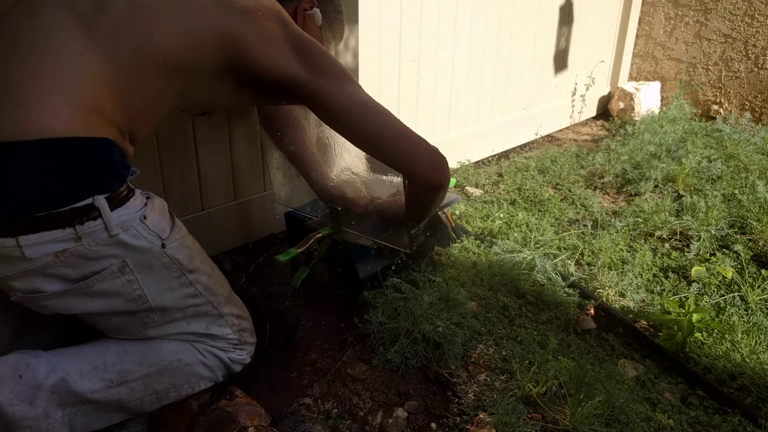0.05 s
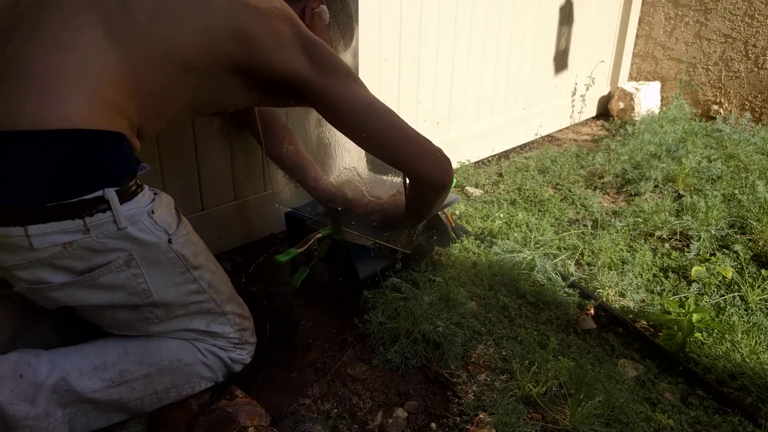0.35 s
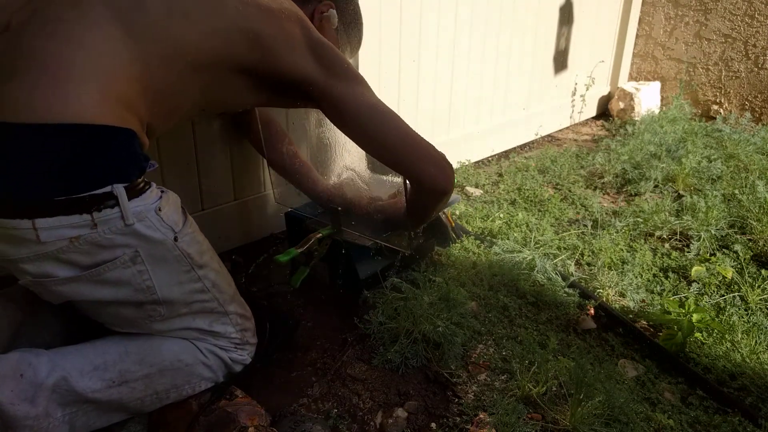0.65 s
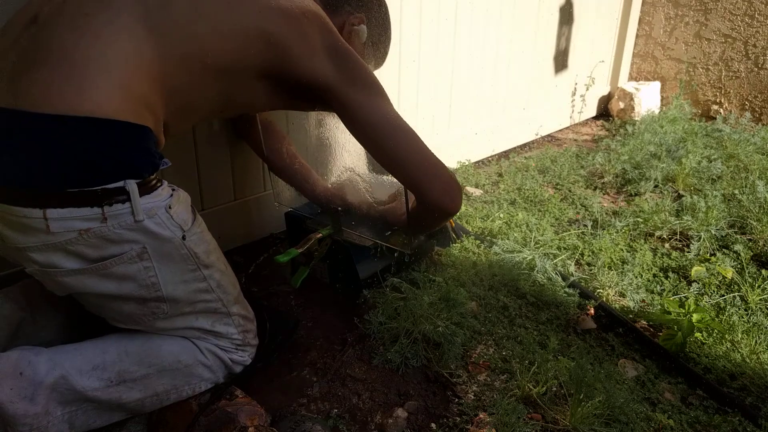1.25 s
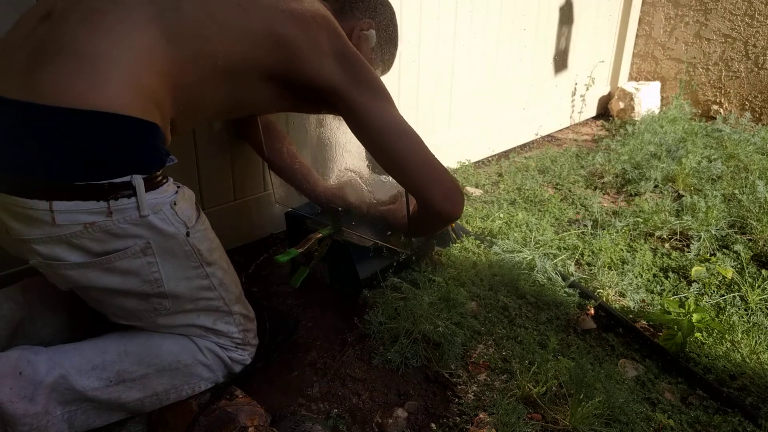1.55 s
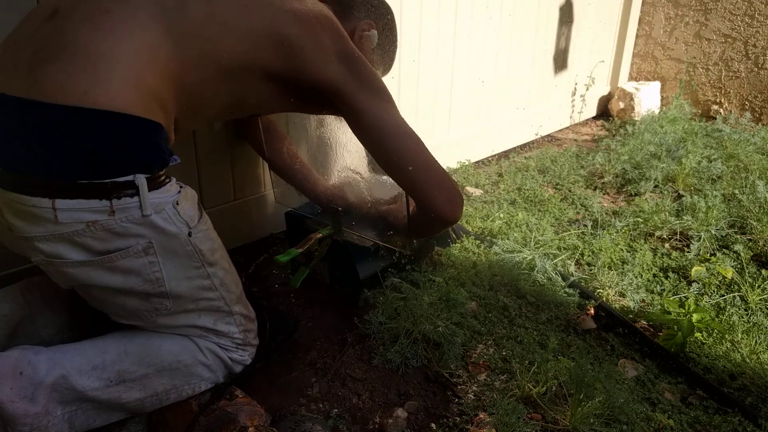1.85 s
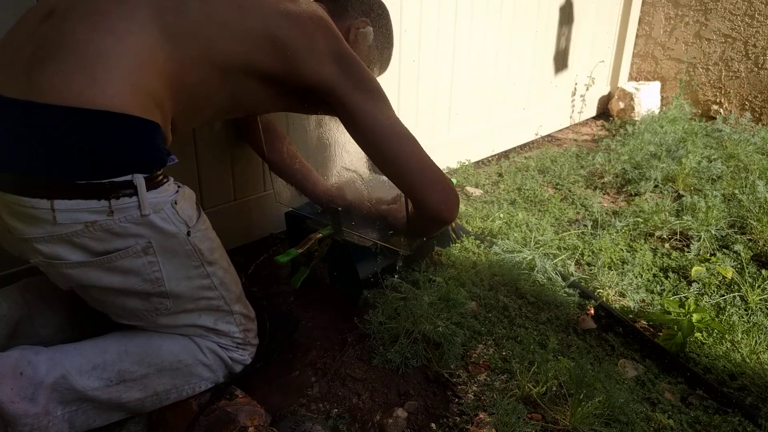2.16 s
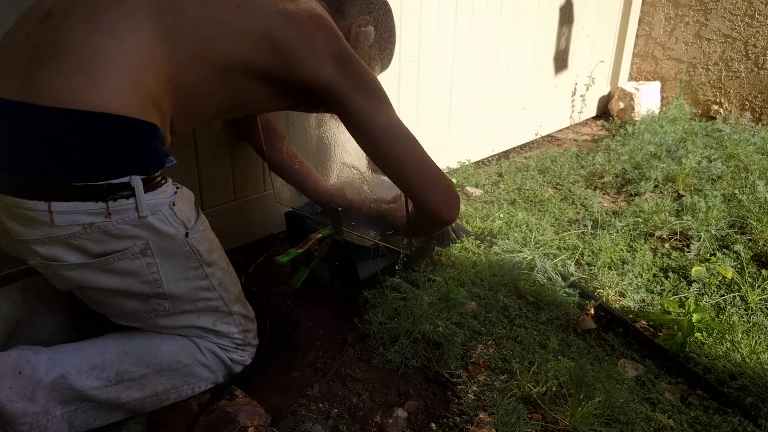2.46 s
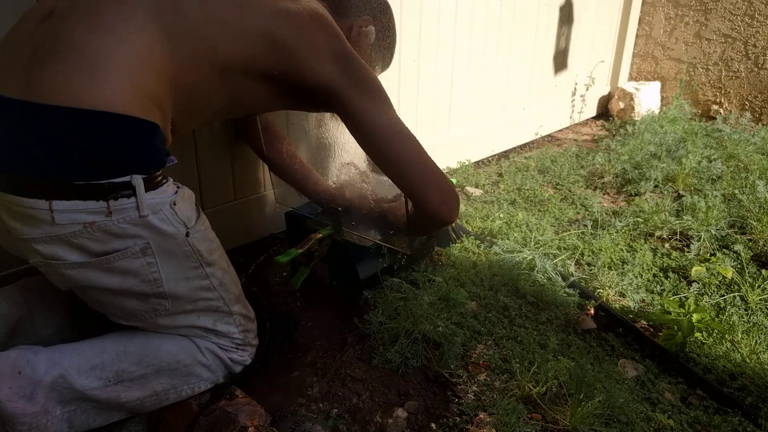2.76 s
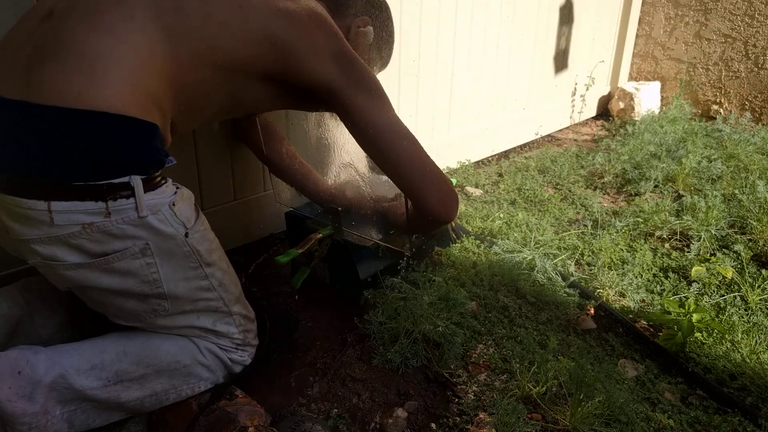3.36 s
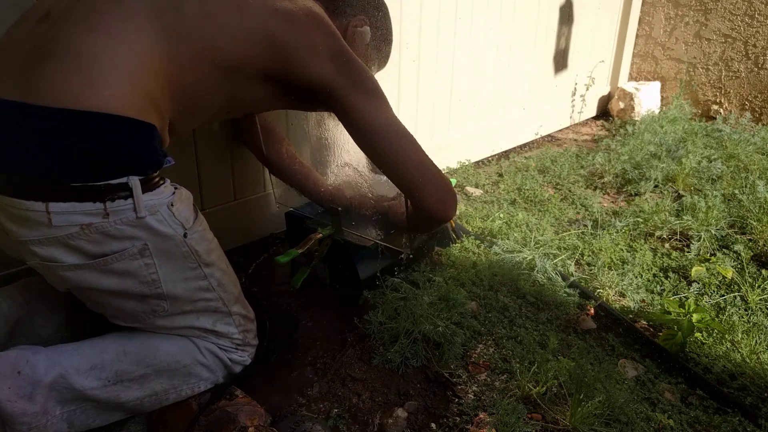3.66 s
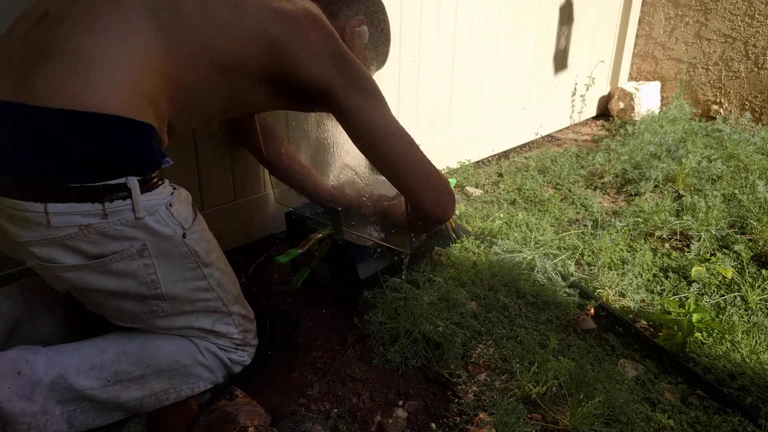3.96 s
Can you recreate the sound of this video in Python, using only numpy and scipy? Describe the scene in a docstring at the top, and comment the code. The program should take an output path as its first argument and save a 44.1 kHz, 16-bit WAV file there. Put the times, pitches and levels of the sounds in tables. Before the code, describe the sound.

Outdoors, a wet saw spins freely with a soft hum and hissing spray. Then a tile meets the blade: loud, gritty grinding and buzzing follow, while the steel disc rings and sings, sinking slightly in pitch.

```python
"""A wet tile saw in a yard

The motor hums and the spinning blade flings hissing water. After about two seconds a tile
touches the rim and is pushed in: grit grinds it, the tile buzzes, the table shudders,
the steel disc rings and sings, and the shaft slows under the load. The sound is mono."""
import sys
import numpy as np
from scipy.fft import rfft, irfft, next_fast_len
from scipy.io import wavfile
from scipy.ndimage import uniform_filter1d, minimum_filter1d, map_coordinates

SR = 44100
rng = np.random.default_rng(int(sys.argv[2]) if len(sys.argv) > 2 else 0)


def file_out(sig):
    """Save sig as 16-bit WAV at sys.argv[1]."""
    # one column per channel
    cols = np.atleast_2d(sig).T
    # limit, then scale
    lim = np.clip(cols, -1, 1)
    pcm = np.round(lim * 32767).astype(np.int16)
    wavfile.write(sys.argv[1], SR, pcm)


N = 176400  # 4 seconds
TIME = np.arange(N) / SR


def amp(db):
    return 10 ** (np.asarray(db) / 20)


def unit(x):
    """Scale x to an average power of 1."""
    return x / np.sqrt(np.mean(x ** 2) + 1e-20)


def curves(rows):
    """Join a table's points: one curve for each column after the time."""
    times, *columns = np.transpose(rows)
    return [np.interp(TIME, times, column) for column in columns]


def wobble(rate):
    """A smooth curve through `rate` random points a second."""
    return map_coordinates(rng.standard_normal(4096), [TIME * rate], mode="wrap")


def swell(centre_s, half_s):
    """A bell-shaped rise and fall."""
    return np.exp(-((TIME - centre_s) / half_s) ** 2)


def filtered(x, response):
    """Turn each frequency in x up or down by response(hz)."""
    size = next_fast_len(N + SR // 2)
    return irfft(rfft(x, size) * response(np.fft.rfftfreq(size, 1 / SR)), size)[:N]


def coloured(x, points):
    """Give x the tone colour drawn by (frequency, level) points."""
    freqs, db = np.transpose(points)
    return unit(filtered(x, lambda hz: amp(np.interp(np.log(hz + 1), np.log(freqs), db))))


def crowded(x, ripple_db, spacing_hz):
    """Many weak resonances of disc, tile and table lift some pitches and lower others."""
    peaks = rng.standard_normal(4096)
    return filtered(x, lambda hz: amp(ripple_db * map_coordinates(peaks, [hz / spacing_hz], mode="wrap")))


def tones(rows, drift, flutter_db):
    """Add up slightly unsteady pure tones."""
    total = np.zeros(N)
    for hz, db in rows:
        level = np.sqrt(2) * amp(db + flutter_db * wobble(7.64))
        total += level * np.sin(2 * np.pi * (hz * TIME + rng.random()) + drift * wobble(7.13))
    return total


# Tone colours of the rumble and the cooling air (frequency [Hz], relative level [dB])
RUMBLE_COLOUR = [(15, -35), (30, -28), (42, -3), (65, -1.5), (85, -4), (110, -17), (200, -40)]
AIR_COLOUR = [(90, -14), (130, -5), (220, -1), (330, -2.5), (450, 0.5), (700, -2.5), (900, -3), (1400, -5),
              (3000, -29)]
# The tones in the hum (frequency [Hz], relative level [dB])
HUM_TONES = [(118.4, -63), (183.0, -51.5), (242.2, -53), (355.3, -62.5), (484.5, -52), (532.9, -62.5),
             (651.4, -75), (732.1, -57.5), (893.6, -75)]
# Hum, rumble and air are turned down during the loud cut, as by a recorder's gain control
# (time [s], gain [dB])
BACKGROUND_DUCKING = [(0, 0), (2.2, 0), (2.35, -4), (2.65, -8), (4, -9)]
def motor():
    """The motor hums over a lumpy rumble and the rush of its cooling air."""
    rumble = amp(-53 + 2.8 * wobble(18)) * coloured(rng.standard_normal(N), RUMBLE_COLOUR)
    air = amp(-45.5) * coloured(rng.standard_normal(N), AIR_COLOUR)
    hum = tones(HUM_TONES, drift=0.8, flutter_db=-2.5)
    return amp(curves(BACKGROUND_DUCKING)[0]) * (rumble + hum + air)


# The free disc's tones (frequency [Hz], relative level [dB])
WHINE_TONES = [(1130, -50), (1190, -52), (1217, -57), (1308, -74), (1400, -62.5)]
# Their slow rise and fall (time [s], gain [dB])
WHINE_GAIN = [(0, 2), (.27, 2), (.42, -4), (.62, -8), (.78, 2), (1.05, 3), (1.28, -8), (1.5, -5), (1.63, 3),
              (1.82, 2), (2.0, -4), (2.2, -6)]
def disc_whine():
    """The freely spinning disc rings faintly; its close tones beat against each other."""
    return amp(curves(WHINE_GAIN)[0]) * tones(WHINE_TONES, drift=0.18, flutter_db=2.3)


# Tone colour of the spray (frequency [Hz], relative level [dB])
SPRAY_COLOUR = [(900, -38), (1400, -21.5), (1750, -20), (2400, -19.5), (3000, -17), (4000, -16),
                (5000, -13), (5900, -10), (6600, -4), (7100, -3.5), (7700, -6.5), (8400, -11.5),
                (9400, -12.5), (10500, -10), (12000, -16), (13500, -23), (15700, -23.5)]
def water_spray(grain_db=0.8, flutter_db=0.38):
    """Water flung off the rim makes a fine hiss, coloured by the guard and table."""
    drops = rng.standard_normal(N) * amp(grain_db * wobble(900) + flutter_db * wobble(50.15))
    return amp(-30.5) * coloured(crowded(drops, ripple_db=1.34, spacing_hz=69.7), SPRAY_COLOUR)


def rim(turns, change_rate, size):
    """The rim's bumps come round on every turn and slowly wear into a new pattern."""
    bumps = rng.standard_normal((256, size))
    return unit(map_coordinates(bumps, [TIME * change_rate, turns % 1 * size], mode="grid-wrap"))


def scrape(turns, repeat, change_rate, lumpy_db=0):
    """Grit on tile: part repeats each turn, part is fresh. Lumps on the rim press harder."""
    repeat = np.clip(repeat, 0, 1)
    repeating = np.sqrt(repeat) * rim(turns, change_rate, size=800)
    fresh = np.sqrt(1 - repeat) * rng.standard_normal(N)
    pressure = amp(lumpy_db * rim(turns, change_rate, size=14))
    return unit((repeating + fresh) * pressure)


def ringing(x, resonances):
    """Let x shake the disc's resonances, the pitches at which it likes to ring."""
    def response(f):
        powers = (amp(db) ** 2 / (1 + (1.6 * (f - hz) / width) ** 2) ** 1.5
                  for hz, width, db in resonances)
        return np.sqrt(sum(powers))
    return unit(filtered(x, response))


# How steadily the rim sits in the slot (time [s], steadiness [0 to 1])
STEADINESS = [(2.2, 0.48), (2.45, 0.43), (2.7, 0.22), (3.05, 0.84), (3.7, 0.69), (4, 0.54)]
# Strength of the grinding (time [s], screech gain [dB], fizz gain [dB])
GRIND_GAINS = [(2.19, -29, -41), (2.2, -22, -41), (2.214, -25, -33), (2.254, -21, -35), (2.304, -22, -29),
               (2.316, -18, -31), (2.336, -22, -34), (2.476, -15, -31), (2.562, -16, -28),
               (2.598, -12, -26), (2.714, -14, -25), (2.804, -12, -25), (2.92, -15, -27), (3.272, -16, -25),
               (3.294, -12, -26), (3.388, -15, -27), (3.908, -14, -25), (4.0, -15, -26)]
# Tone colour of the grit's hiss (frequency [Hz], relative level [dB])
GRIT_COLOUR = [(1200, -36), (2000, -18), (2700, -16.5), (3500, -7.5), (4600, -12.5), (5600, -6),
               (6300, -3.5), (6900, 2.5), (7700, -3.5), (8400, -8), (9100, -10), (10200, -13.5),
               (11000, -9.5), (13000, -13.5), (15600, -16)]
# The disc's high resonances (frequency [Hz], width [Hz], relative level [dB])
HIGH_RESONANCES = [(4820, 25, -14), (4995, 22, -13), (5510, 60, -13), (5966, 30, -8), (6212, 25, -9),
                   (6580, 22, 1), (6717, 40, -1), (6813, 40, 0), (6982, 30, -1), (7149, 25, -6),
                   (7500, 45, -3), (7613, 35, -3), (7730, 50, -5), (8083, 22, -6), (8176, 22, -6),
                   (8344, 25, -11), (8570, 80, -12), (9254, 30, -15), (9665, 45, -11), (10524, 50, -15)]
def grinding(turns, fizz_hz=9700):
    """Grit hisses through the tile, with a high fizz on top, and makes the disc screech."""
    screech_db, fizz_db = curves(GRIND_GAINS)
    steady, = curves(STEADINESS)
    force = scrape(turns, repeat=0.51 * steady, change_rate=9.7)
    hiss = coloured(crowded(force, ripple_db=1.6, spacing_hz=45.7), GRIT_COLOUR)
    fizz = filtered(hiss, lambda hz: 1 / (1 + (fizz_hz / (hz + 1)) ** 16))
    shrill = ringing(scrape(turns, repeat=0.5 * steady, change_rate=9, lumpy_db=2.5), HIGH_RESONANCES)
    screech = amp(-3.5) * unit(hiss - fizz) + amp(-2) * shrill
    return amp(screech_db) * screech + amp(fizz_db + 3.5) * unit(fizz)


# The disc's low resonances (frequency [Hz], width [Hz], relative level [dB])
LOW_RESONANCES = [(888, 16, -9), (1400, 30, -8), (1520, 25, -11), (1997, 25, -10), (2545, 30, -11),
                  (2780, 30, -10), (3206, 25, 2), (3298, 55, -2), (3445, 50, -4), (3665, 25, -3)]
# How strongly they ring (time [s], relative level [dB])
RING_LEVEL = [(2.17, -48), (2.27, -34), (2.45, -29), (2.68, -25), (2.85, -30), (3.1, -27), (3.6, -30),
              (4, -29)]
def disc_ring(turns):
    """The scraping also rings the steel disc at lower pitches."""
    force = scrape(turns, repeat=curves(STEADINESS)[0], change_rate=6, lumpy_db=3.5)
    return amp(curves(RING_LEVEL)[0] - 0.5) * ringing(force, LOW_RESONANCES)


# Tone colour of the tile (frequency [Hz], relative level [dB])
TILE_COLOUR = [(100, -27), (190, -9), (400, -3), (600, 0.5), (900, 1.5), (1300, 8), (1700, -2),
               (2200, -0.5), (2800, 3), (3500, 1), (6000, 5.5), (15000, -40)]
# Strength of its buzz (time [s], relative level [dB])
BUZZ_LEVEL = [(2.17, -46.5), (2.368, -44), (2.45, -37), (2.49, -42), (2.582, -36.5), (3.004, -40),
              (3.856, -37.5), (4.0, -35.5)]
def tile_buzz(turns):
    """The tile chatters in step with the shaft."""
    force = scrape(turns, repeat=curves(STEADINESS)[0] + 0.31, change_rate=4)
    return amp(curves(BUZZ_LEVEL)[0] + 8.5) * coloured(force, TILE_COLOUR)


def shaft_tone(turns, per_turn, rough):
    """A wavering tone that vibrates per_turn times for each turn of the shaft."""
    level = np.sqrt(2) * (1 + rough * wobble(45))
    return level * np.sin(2 * np.pi * (per_turn * turns + rng.random()) + rough * wobble(30.25))


# One low resonance, split in two by the spin (frequency [Hz], width [Hz], relative level [dB])
SPLIT_RESONANCE = [(1135, 25, 0), (1175, 28, 0)]
# Strength of its rasp (time [s], level [dB])
RASP_LEVEL = [(2.17, -44), (2.3, -39), (2.5, -31.5), (2.65, -26), (2.8, -36.5), (3.0, -37), (3.6, -35),
              (4, -34)]
# The two singing tones (time [s], unused speed [turns/s], lower gain [dB], upper gain [dB])
SING_GAINS = [(2.17, 59.6, -63, -66), (2.226, 58.8, -43, -48), (2.506, 59.2, -40, -42),
              (2.73, 58.2, -29, -42), (2.77, 57.9, -35.5, -36), (2.924, 57.5, -25.5, -46),
              (2.994, 57.3, -22, -39), (3.03, 57.2, -21, -59), (3.086, 57.2, -17, -47),
              (3.142, 57.2, -16, -55), (3.422, 56.7, -22, -26), (3.556, 56.7, -17.5, -50),
              (3.612, 56.3, -20.5, -31), (3.678, 56.1, -34, -32), (3.694, 56.2, -22.5, -33.5),
              (3.902, 55.4, -38, -21.5), (3.958, 55.1, -33, -35), (4.0, 55.0, -29, -26)]
def disc_singing(turns):
    """The disc rasps under the grit, then falls into step with the shaft and howls."""
    rasp = amp(curves(RASP_LEVEL)[0]) * ringing(rng.standard_normal(N), SPLIT_RESONANCE)
    _, lower_db, upper_db = curves(SING_GAINS)
    lower = amp(lower_db) * shaft_tone(turns, per_turn=20, rough=0.032)
    upper = amp(upper_db) * shaft_tone(turns, per_turn=21, rough=0.032)
    return rasp + amp(-2) * (lower + upper)


# Tones of the cut (vibrations [per turn], peak time [s], half length [s], level [dB])
SLOT_TONES = [(3, 3.1, 1.0, -55), (4, 3.33, 1, -54), (5, 2.955, 0.39, -40), (7, 2.68, 0.19, -45),
              (7, 3.84, 0.32, -47), (8, 3.19, 0.44, -45.5), (10, 2.69, 0.16, -37.5), (10, 3.6, 0.32, -45.5),
              (11, 2.9, 0.23, -42.5), (13, 2.97, 0.32, -49), (15, 2.67, 0.13, -50), (16, 3.85, 0.34, -37.5),
              (17, 3.25, 0.26, -40.5), (19, 3.96, 0.05, -31.5), (24, 3.175, 0.099, -35.5),
              (25, 3.28, 0.14, -39), (25, 3.84, 0.15, -33.5), (56, 3.27, 0.18, -37),
              (58, 3.9, 0.066, -25.5)]
def slot_tones(turns):
    """Single tones, in step with the shaft, swell and fade as the slot gets longer."""
    return sum(amp(db) * swell(peak_s, half_s) * shaft_tone(turns, per_turn, rough=0.2)
               for per_turn, peak_s, half_s, db in SLOT_TONES)


# Tone colour of the shaking table (frequency [Hz], relative level [dB])
SHUDDER_COLOUR = [(100, -32), (165, -7), (205, 7), (260, -14), (400, -6), (700, -25)]
def table_shudder():
    """The table shakes briefly as the rim bites in."""
    level = amp(-40.5) * swell(centre_s=2.53, half_s=0.15)
    return level * coloured(rng.standard_normal(N), SHUDDER_COLOUR)


# The shaft slows under the load (time [s], speed [turns/s])
SHAFT_SPEED = [(0, 59.6), (2.15, 59.6), (2.4, 59.1), (2.62, 58.7), (2.8, 57.8), (3.08, 57.25), (3.3, 57.0),
               (3.53, 56.65), (3.7, 56.1), (3.88, 55.6), (4, 54.9)]
def scene(contact_s=2.18, bite_s=0.02):
    """The saw runs freely; the cutting sounds join in when the tile touches it."""
    turns = np.cumsum(curves(SHAFT_SPEED)[0]) / SR
    contact = np.clip((TIME - contact_s) / bite_s, 0, 1)
    idling = motor() + disc_whine() + water_spray()
    cutting = grinding(turns) + disc_ring(turns) + table_shudder()
    cutting += tile_buzz(turns) + slot_tones(turns) + disc_singing(turns)
    saw = idling + contact * cutting
    return np.array([saw, saw])


def record(dry, ceiling=0.8, top_hz=15750):
    """A fast limiter turns loud peaks down, then the very highest treble is cut off."""
    needed = np.minimum(1, ceiling / (np.abs(dry).max(axis=0) + 1e-9))
    gain = uniform_filter1d(minimum_filter1d(needed, size=129), size=129)
    return np.array([filtered(channel * gain, lambda hz: hz < top_hz) for channel in dry])


dry = scene()
out = record(dry)
file_out(out)
```